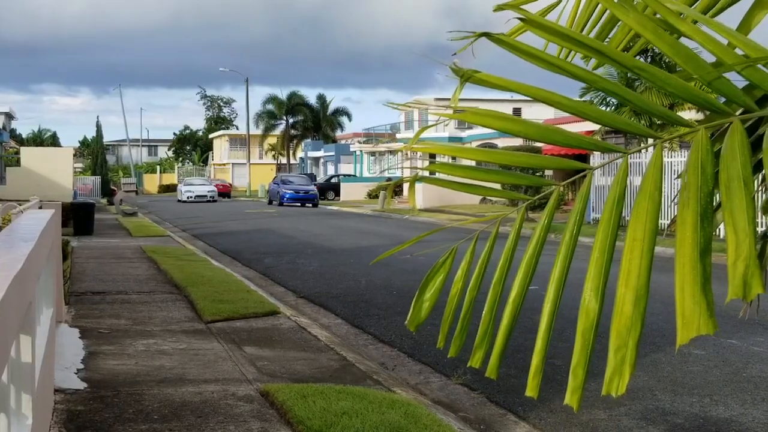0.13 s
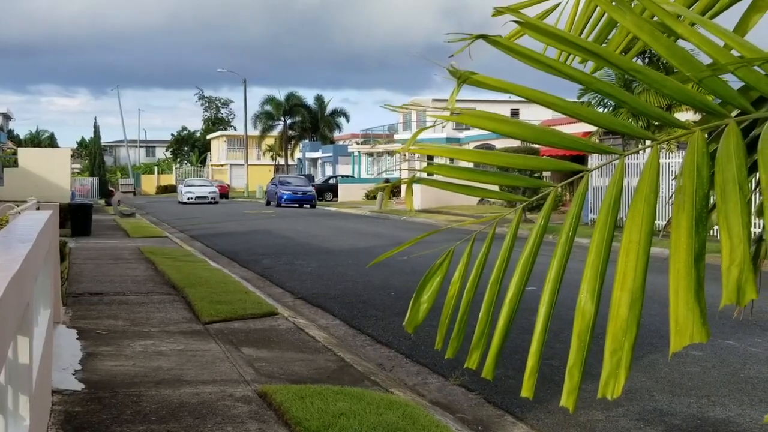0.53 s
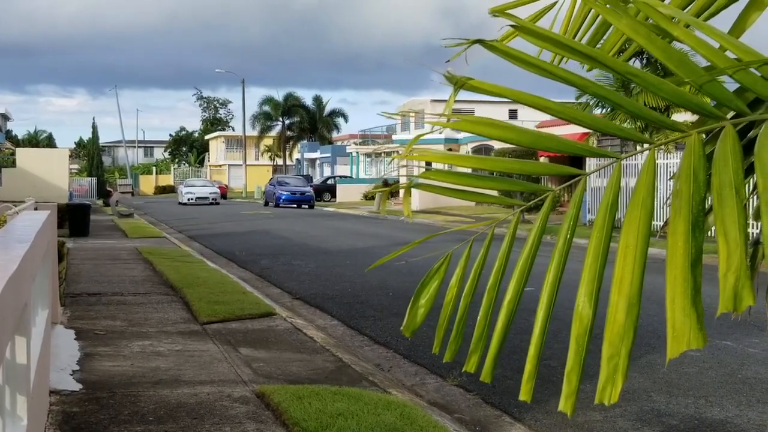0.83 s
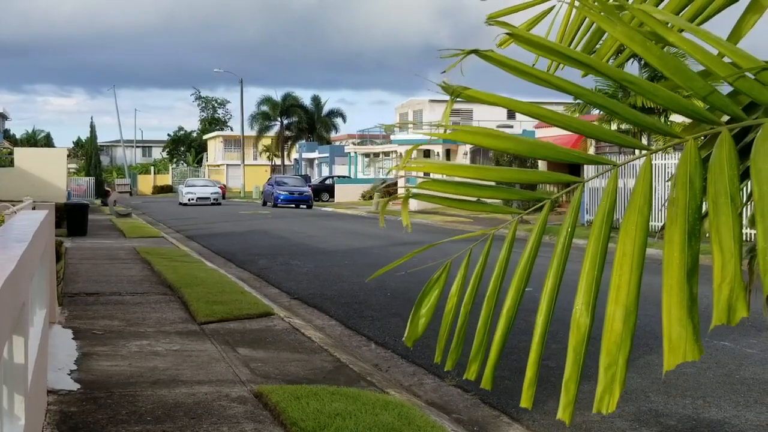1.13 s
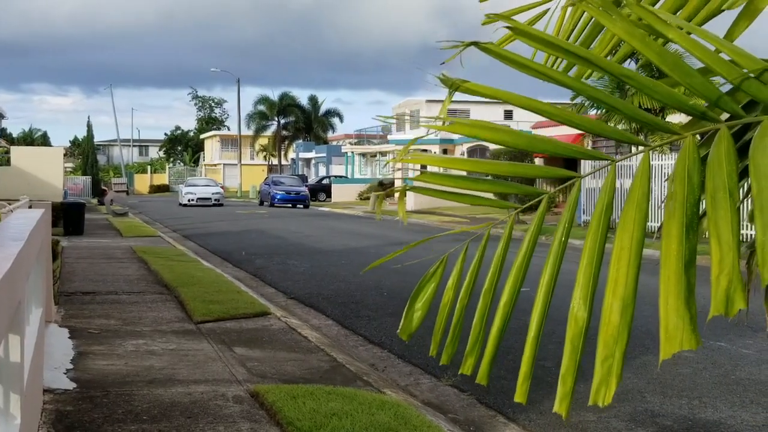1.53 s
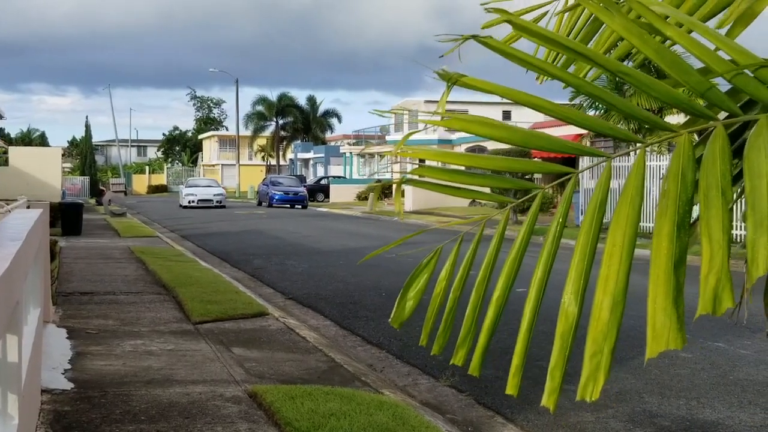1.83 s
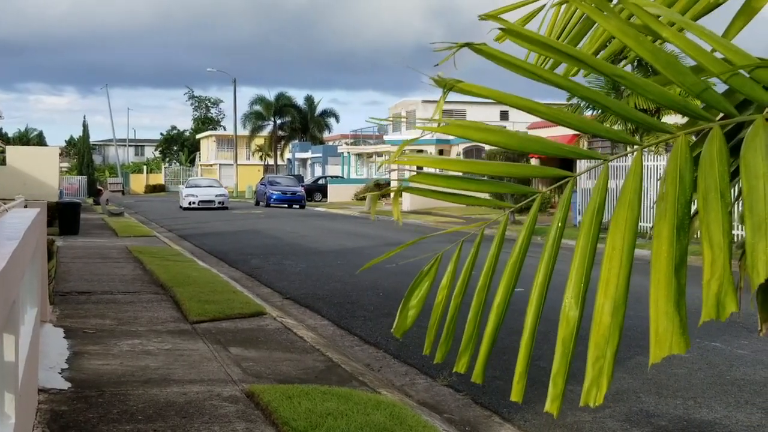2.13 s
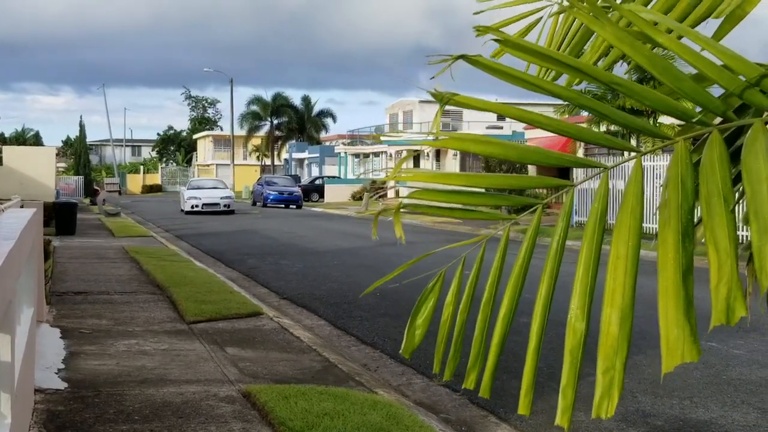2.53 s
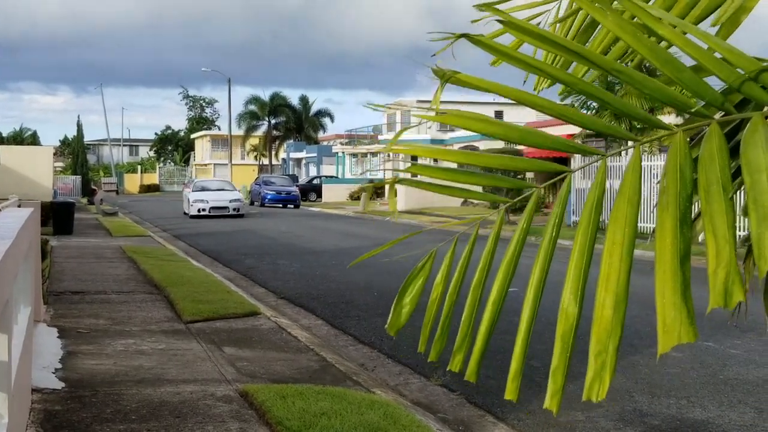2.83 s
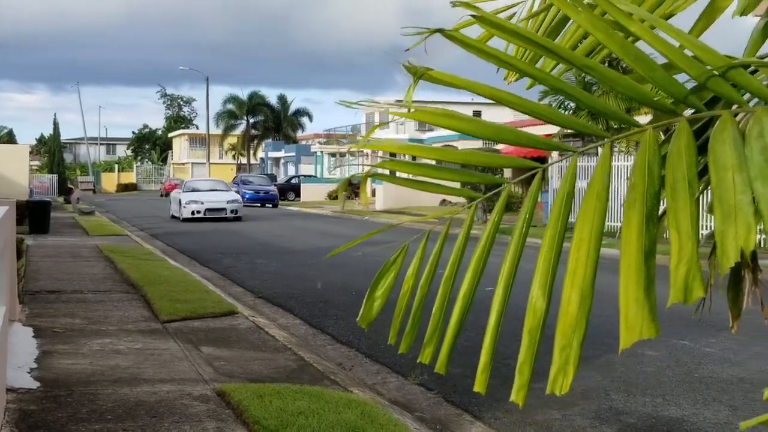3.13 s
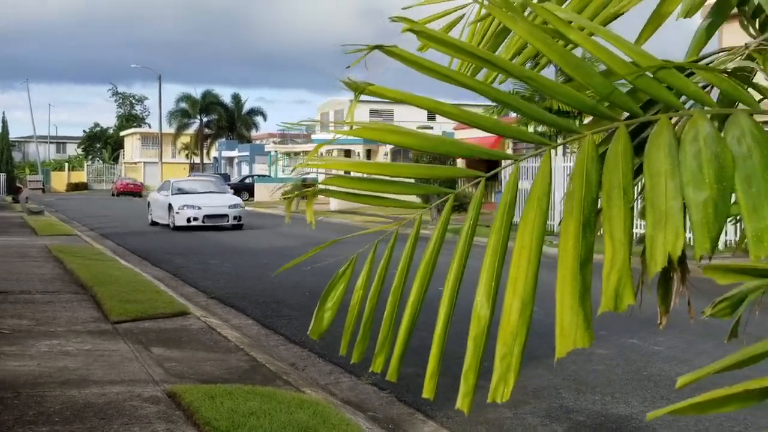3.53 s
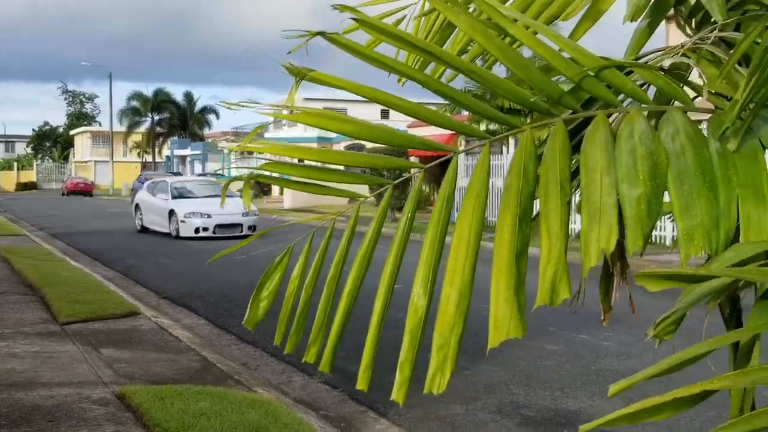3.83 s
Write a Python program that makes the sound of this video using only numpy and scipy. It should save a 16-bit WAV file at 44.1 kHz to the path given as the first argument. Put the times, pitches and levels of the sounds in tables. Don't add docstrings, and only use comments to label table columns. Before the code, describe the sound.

A four-cylinder turbo car accelerates up a residential street towards a kerbside stereo microphone, its low drone rising and pulsing with house echoes; at the end the throttle lifts and rapid hissing, whooping flutters burst out.

```python
import sys
import numpy as np
from scipy import signal
from scipy.fft import rfft, irfft, next_fast_len
from scipy.io import wavfile
from scipy.ndimage import uniform_filter1d, map_coordinates

SR = 44100
rng = np.random.default_rng(int(sys.argv[2]) if len(sys.argv) > 2 else 0)


def decibels_to_gain(level_db):
    exponent = np.asarray(level_db, float) / 20
    return 10 ** exponent


def transcribe(signal):
    frames = np.atleast_2d(signal).T
    limited = np.clip(frames, -1, 1)
    pcm = np.round(limited * 32767).astype(np.int16)
    wavfile.write(sys.argv[1], SR, pcm)


N = 176400
T = np.arange(N) / SR

# time in seconds, firing rate in Hz.
FIRING_RATE = [(0, 58.6), (.34, 63.44), (.65, 68.35), (1.08, 76), (1.46, 83.62), (1.84, 93.6),
               (2.19, 103.8), (2.54, 115), (2.75, 125.3), (3.02, 138.3), (3.29, 151.9), (3.47, 160.1),
               (3.55, 159.9), (3.6, 139), (3.8, 144.1), (4, 141.2)]
# time in seconds, load in dB, boost in dB.
LOAD_AND_BOOST = [(0, -53, -85), (.56, -47.5, -88), (1.3, -41.5, -67), (1.9, -37.5, -47.5),
                  (2.6, -34, -33.5), (3.1, -32.5, -30.5), (3.5, -32, -32.5), (3.64, -29, -34),
                  (4, -32.5, -38)]
LIFT_S, CUT_S, CUT_DB = 3.67, 0.07, -17

# dip in seconds, dip level in dB, next crest in dB.
HALF_SWELLS = [(-.3, -73, -50), (2.83, -49, -32), (3.45, -75, -28.5), (3.7, -61, -57), (4.05, -54, -41)]
# dip in seconds, dip level in dB, next crest in dB.
FIRING_SWELLS = [(.05, -91, -30), (.66, -32.5, -30), (.79, -43, -23.5), (1.16, -33, -23.5),
                 (1.48, -30.5, -16.5), (1.9, -28.5, -16.5), (2.23, -41, -13.5), (2.41, -21, -14.5),
                 (2.501, -50, -7.5), (2.781, -27, -10.5), (2.931, -17.5, -7), (3.178, -20.5, -6),
                 (3.413, -15, -15.5), (3.5, -29, -20.5), (3.56, -46, -15.5), (3.645, -21.5, -11.5),
                 (3.79, -17, -11), (4.05, -18, -10)]
# dip in seconds, dip level in dB, next crest in dB.
ONE_HALF_SWELLS = [(-.3, -72, -71), (1.25, -45, -37), (1.6, -40, -36), (2.25, -48, -31), (2.8, -46, -22),
                   (3.15, -23, -26), (3.6, -51, -61), (4.05, -43, -43)]
# dip in seconds, dip level in dB, next crest in dB.
OCTAVE_SWELLS = [(-.05, -47, -30), (.1, -36, -32), (.39, -53, -29), (.57, -30.5, -23), (.81, -38, -21.5),
                 (1.163, -34, -18), (1.41, -22.5, -17.5), (1.582, -44, -19.5), (1.741, -49, -25.5),
                 (1.9, -50, -16), (2.189, -61, -27.5), (2.3, -21, -26), (2.47, -26, -20),
                 (2.59, -42, -19.5), (2.76, -29.5, -23), (2.94, -27, -21.5), (3.21, -19.5, -23),
                 (3.394, -37, -16), (3.52, -42.5, -22), (3.64, -32, -28.5), (3.81, -30.5, -30.5),
                 (4.05, -49, -30)]
# dip in seconds, dip level in dB, next crest in dB.
THIRD_SWELLS = [(-.02, -67, -29.5), (.3, -41, -33.5), (.7, -47, -38.5), (.95, -45.5, -29.5),
                (1.25, -41.5, -41), (1.49, -41, -31), (1.8, -49, -35), (2, -54, -29), (2.17, -53, -29),
                (2.3, -58, -30.5), (2.62, -33, -37), (3.1, -42, -45), (4.05, -66, -52)]
# dip in seconds, dip level in dB, next crest in dB.
FOURTH_SWELLS = [(-.1, -58, -50.5), (.5, -50, -39.5), (1.45, -52, -56), (1.8, -48, -39.5),
                 (2.2, -57, -58.5), (2.7, -49, -36.5), (3.5, -39, -49), (4.05, -60, -64)]
# multiple of firing rate, level over
# load in dB.
WEAK_ORDERS = [(2.5, 1.5), (3.5, -13), (1.25, -7), (1.75, -7.5), (2.25, -5), (2.75, -10), (12, -30)]
# frequency in Hz, gain in dB.
PIPE_RESPONSE = [(300, -2.5), (370, -9.5), (460, -16.5), (600, -9), (2000, -1)]
FADE_RATE, FADE_SHARE = 5.56, 0.84
# frequency in Hz, level in dB.
ROAR_SPECTRUM = [(20, -36), (50, -23.5), (92, -4), (177, -0.5), (320, -7), (550, -45.5)]
ROAR_DB = 9

# frequency in Hz, level in dB.
BAY_SPECTRUM = [(250, -33), (400, -14.5), (620, -3), (900, -6.5), (2400, -10), (3000, -16.5), (6000, -20),
                (15700, -43.5)]
# centre in Hz, width in Hz, gain in dB.
BAY_COLOUR = [(1013, 81, -8.5), (1360, 124, 5.5), (1557, 110, -5.5), (1894, 67, 7.5), (3300, 84, 5),
              (3863, 94, 8.5), (4480, 440, 6.5)]
BAY_DB, GATE = -0.5, 0.042
BAY_GROWS, BARK_GROWS, BARK_DB, FULL_LOAD_DB = 0.97, 2.45, -6, -35
CYLINDER_PUFFS = (1, .1, -.45, .5)
BARK_SCATTER, BARK_JITTER = 0.26, 0.012
# frequency in Hz, level in dB.
BARK_SPECTRUM = [(400, -80), (500, -0.5), (620, 2.5), (850, -3), (960, -22.5), (1100, -45)]
BARK_STOPS_S, BARK_FADE_S = 3.43, 0.046

# frequency in Hz, level in dB.
INTAKE_SPECTRUM = [(2000, -50), (4500, -5), (5600, -3), (7500, 2.5), (9300, -5.5), (12000, 1.5),
                   (13500, 0.5), (15700, -6)]
# frequency in Hz, level in dB.
AIR_SPECTRUM = [(2000, -35), (4500, 1.5), (6500, -6.5), (9000, -10), (15700, -25)]
INTAKE_DB, AIR_DB = -0.5, -12.5
AIR_GROWS, AIR_TOP_S, AIR_SINKS_DB_PER_S = 0.63, 2.58, 19.5
# time in seconds, frequency in Hz, level in dB.
WHEEL_WHISTLE = [(2.55, 9720, -58), (2.63, 9800, -44), (2.7, 9950, -56), (2.81, 10570, -44),
                 (3.1, 10740, -42), (3.23, 11040, -39), (3.36, 11300, -43), (3.53, 11780, -42),
                 (3.57, 11950, -70)]

# start in seconds, length in seconds, from Hz, to Hz, level in dB.
BIRD_NOTES = [
    (0.193, 0.094, 10600, 7300, -53.5),
    (.41, .09, 8800, 8400, -60),
]
# time in seconds, level in dB.
LEAF_TICKS = [
    (.322, -48.5),
    (.39, -72),
    (.803, -51),
]
# frequency in Hz, level in dB.
TICK_SPECTRUM = [(3000, -33.5), (7000, 0), (12000, -2), (15700, -4)]
TICK_T60 = 0.022

# centre in seconds, length in seconds, hiss in dB, body in dB.
SURGE_CHUFFS = [
    (3.544, 0.11, -30.5, -22.5),
    (3.704, 0.072, -30, -28.5),
    (3.821, 0.062, -28, -32),
    (3.937, 0.045, -30, -36),
]
# frequency in Hz, level in dB.
HISS_SPECTRUM = [(2000, -42), (5000, -3), (8000, 1.5), (10000, -2.5), (12500, 1), (13800, 9), (15000, 1),
                 (15700, -4)]
# frequency in Hz, level in dB.
BODY_SPECTRUM = [(400, -37), (700, -10), (1500, -8.5), (2400, -12), (3200, -19), (7000, -22)]
# centre in Hz, width in Hz, gain in dB.
DUCT_RESONANCES = [(2024, 105, 12.4), (1280, 120, 2.9), (745.8, 260, 7.2)]
LEAK_DB, CHUFF_EDGE = -32.5, 0.5
# start in seconds, length in seconds, start in Hz, level in dB, octave level in dB.
WHEEL_WHOOPS = [
    (3.53, 0.046, 952.5, -19, -18),
    (3.592, 0.061, 741, -24.5, -36),
    (3.67, 0.038, 785, -21.5, -32),
    (3.699, 0.047, 713, -20.5, -25),
    (3.799, 0.048, 659, -30, -18.5),
    (3.837, 0.05, 606, -23, -35),
    (3.912, 0.054, 595, -23, -30),
    (3.956, 0.029, 566, -28, -45),
]
SAG_HZ_PER_S, WHOOP_ROUGH, WHOOP_THIRD_DB = 1300, 0.22, -12.5

# frequency in Hz, left-right likeness from 0 to 1.
LIKENESS = [(30, .6), (80, 0.9), (250, 0.95), (700, 0.82), (1300, .72), (4000, 0.66), (9000, .45),
            (15500, .75)]
# frequency in Hz, left over right in dB.
TILT = [(60, 0.6), (240, .5), (700, 1.5), (1300, 1.5), (2000, 6), (3200, 2), (4500, 5.5), (12500, -1.5),
        (15000, -1.5)]
# centre in Hz, width in Hz, left over right in dB.
HOUSING_SHADE = [(7000, 1100, 1.5), (8700, 280, -5.5), (10000, 420, 0.5), (10640, 570, 11.5)]
# frequency in Hz, radians by which left leads.
LEFT_LEADS = [(700, 0), (1400, .3), (2000, .7), (3100, .2), (5000, 1.2), (10500, 2.4), (11400, 2.3),
              (11800, -.4)]
FENCE_S, FENCE_DB, FENCE_HZ = 0.008, -16, 1700


def unit(x):
    return x / np.sqrt(np.mean(x ** 2) + 1e-20)


def along(points, hz):
    f, v = np.transpose(points)
    return np.interp(np.log(hz + 1), np.log(f + 1), v)


def with_peaks(points, peaks, hz):
    return along(points, hz) + sum(db * np.exp(-((hz - c) / w) ** 2) for c, w, db in peaks)


def curves(rows):
    s, *cols = np.transpose(rows)
    return [np.interp(T, s, c) for c in cols]


def wobble(rate):
    return map_coordinates(rng.standard_normal(2000), [T * min(rate, 400)])


def filtered(x, response):
    m = next_fast_len(N + 8192)
    return irfft(rfft(x, m) * response(np.fft.rfftfreq(m, 1 / SR)), m)[..., :N]


def rush(spectrum, patchy_db, peaks=()):
    z = signal.stft(rng.standard_normal((2, N)), nperseg=512)[2]
    field = uniform_filter1d(rng.standard_normal(z.shape[1:]), size=5, axis=0)
    field = uniform_filter1d(field, size=10, axis=1)
    pair = signal.istft(z * decibels_to_gain(patchy_db * unit(field)), nperseg=512)[1][:, :N]

    def mid_side(hz):
        angle = np.arccos(np.clip(along(LIKENESS, hz), -1, 1)) / 2
        return decibels_to_gain(with_peaks(spectrum, peaks, hz)) * [np.cos(angle), np.sin(angle)]

    mid, side = filtered(pair, mid_side)
    return unit(np.array([mid + side, mid - side]))


def bump(centre, length):
    return np.cos(np.pi * np.clip((T - centre) / length, -.5, .5)) ** 2


def swells(rows):
    s, dip_db, crest_db = np.transpose(rows)
    place = np.interp(T, s, np.arange(len(s)))
    low = np.interp(T, s, decibels_to_gain(dip_db))
    crest = decibels_to_gain(crest_db)[place.astype(int)]
    return low + (crest - low) * np.sin(np.pi * (place % 1))


def shaft():
    hz, = curves(FIRING_RATE)
    return hz, 2 * np.pi * np.cumsum(hz * (1 + 0.00604 * wobble(14))) / SR


def exhaust(hz, phase, load_db):
    orders = [(.5, HALF_SWELLS), (1, FIRING_SWELLS), (1.5, ONE_HALF_SWELLS),
              (2, OCTAVE_SWELLS), (3, THIRD_SWELLS), (4, FOURTH_SWELLS)]
    tone = np.zeros(N)
    for k, rows in orders:
        level = swells(rows) * (1 + 0.09 * (k - .5) * wobble(30))
        tone += level * np.sin(k * phase + k + 0.13 * k * wobble(25))
    lifted_db = CUT_DB / (1 + np.exp((LIFT_S - T) / CUT_S))
    for k, db in WEAK_ORDERS:
        fade = 1 + FADE_SHARE * (wobble(FADE_RATE) + 1j * wobble(FADE_RATE))
        level = decibels_to_gain(db + load_db + lifted_db + along(PIPE_RESPONSE, k * hz))
        tone += level * np.real(fade * np.exp(1j * k * phase))
    roar = decibels_to_gain(ROAR_DB + load_db + lifted_db / 2) * rush(ROAR_SPECTRUM, patchy_db=1)
    return np.sqrt(2) * tone + roar


def engine_bay(phase, load_db):
    swing_db = load_db - FULL_LOAD_DB
    hum = decibels_to_gain(BAY_DB + BAY_GROWS * swing_db + 1.27 * wobble(4.985)) * (1 + GATE * np.cos(phase))
    hum = hum * rush(BAY_SPECTRUM, patchy_db=0.4, peaks=BAY_COLOUR)
    cycle = phase / (2 * np.pi)
    firing = np.arange(1, int(cycle[-1]))
    jittered = firing + BARK_JITTER * rng.standard_normal(len(firing))
    at = np.interp(jittered, cycle, np.arange(N)).astype(int)
    size = np.resize(CYLINDER_PUFFS, len(firing)) + BARK_SCATTER * rng.standard_normal(len(firing))
    puffs = np.bincount(at, size, N)
    bark = unit(filtered(puffs, lambda hz: decibels_to_gain(along(BARK_SPECTRUM, hz))))
    bark_level = decibels_to_gain(BARK_DB + BARK_GROWS * swing_db + 1.7 * wobble(4.135))
    throttle = 1 / (1 + np.exp((T - BARK_STOPS_S) / BARK_FADE_S))
    return decibels_to_gain(FULL_LOAD_DB) * (hum + bark_level * bark * throttle)


def turbo(boost_db):
    hiss = decibels_to_gain(INTAKE_DB + boost_db) * rush(INTAKE_SPECTRUM, patchy_db=2)
    sinks_db = AIR_SINKS_DB_PER_S * np.clip(T - AIR_TOP_S, 0, .7)
    air_db = AIR_DB + AIR_GROWS * np.maximum.accumulate(boost_db) - sinks_db
    air = decibels_to_gain(air_db) * rush(AIR_SPECTRUM, patchy_db=1.5)
    hz, db = curves(WHEEL_WHISTLE)
    turn = 2 * np.pi * np.cumsum(hz + 15 * wobble(60)) / SR
    whistle = decibels_to_gain(db + 3.5 + 2 * wobble(25)) * np.sin(turn) * (T > 2.5)
    return hiss + air + whistle


def garden():
    bird = np.zeros(N)
    for s, length, from_hz, to_hz, db in BIRD_NOTES:
        hz = np.interp(T, [s, s + length], [from_hz, to_hz]) + 600 * wobble(250)
        level = decibels_to_gain(db + 3 * wobble(90)) * bump(s + length / 2, 1.3 * length)
        bird += level * np.sin(2 * np.pi * np.cumsum(hz) / SR)
    ticks = sum(decibels_to_gain(db - 60 * np.abs(T - s) / TICK_T60) for s, db in LEAF_TICKS)
    return bird * np.array([wobble(400), wobble(400)]) + ticks * rush(TICK_SPECTRUM, patchy_db=6)


def flutter():
    hiss = sum(decibels_to_gain(db) * bump(s, 1.5 * length) ** CHUFF_EDGE for s, length, db, _ in SURGE_CHUFFS)
    hiss = hiss * rush(HISS_SPECTRUM, patchy_db=1)
    leak = decibels_to_gain(LEAK_DB) * np.clip((T - SURGE_CHUFFS[0][0]) / CUT_S, 0, 1)
    puffs = sum(decibels_to_gain(db) * bump(s + 0.017, 1.65 * length) for s, length, _, db in SURGE_CHUFFS)
    body = (leak + puffs) * rush(BODY_SPECTRUM, patchy_db=1, peaks=DUCT_RESONANCES)
    whoop = np.zeros(N)
    for s, length, hz, db, octave_db in WHEEL_WHOOPS:
        turn = np.exp(2j * np.pi * (hz * (T - s) - SAG_HZ_PER_S * (T - s) ** 2 / 2))
        voice = 0
        for k, partial_db in [(1, db + 1.5), (2, octave_db - 2.0), (3, db + WHOOP_THIRD_DB)]:
            rough = 1 + WHOOP_ROUGH * (wobble(70) + 1j * wobble(70))
            voice = voice + decibels_to_gain(partial_db) * rough * turn ** k
        whoop += bump(s + length / 2, 1.2 * length) * np.real(voice)
    return hiss + body + whoop


def fence(hz):
    delay = FENCE_S * (.3 + rng.random((2, 10, 1)))
    size = decibels_to_gain(FENCE_DB) * rng.standard_normal((2, 10, 1))
    echoes = (size * np.exp(-2j * np.pi * hz * delay)).sum(axis=1)
    return 1 + echoes / (1 + (FENCE_HZ / (hz + 1)) ** 4)


def scene():
    load_db, boost_db = curves(LOAD_AND_BOOST)
    hz, phase = shaft()
    car = exhaust(hz, phase, load_db) + engine_bay(phase, load_db) + turbo(boost_db)
    return car + garden() + flutter()


def band_limit(x):
    return signal.sosfilt(signal.butter(12, 15710, fs=SR, output="sos"), x)


def record(dry):
    side = np.array([[.5], [-.5]])

    def pair(hz):
        tilt = decibels_to_gain(with_peaks(TILT, HOUSING_SHADE, hz) * side)
        return fence(hz) * tilt * np.exp(1j * along(LEFT_LEADS, hz) * side)

    x = filtered(dry, pair)
    return band_limit(x / (1 + np.abs(x) ** 6) ** (1 / 6))


dry = scene()
out = record(dry)
transcribe(out)
```